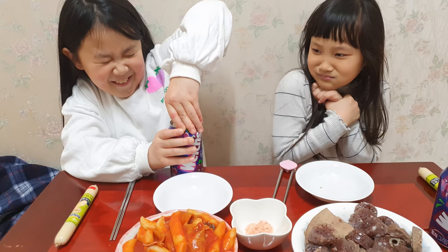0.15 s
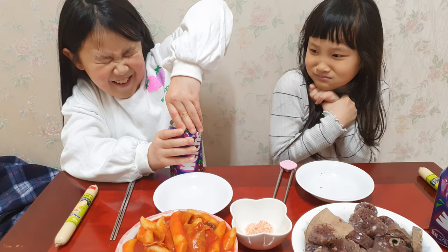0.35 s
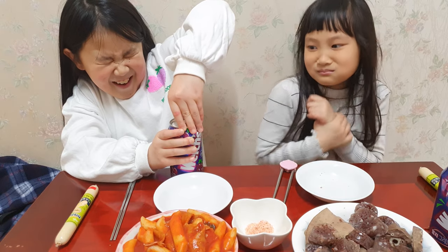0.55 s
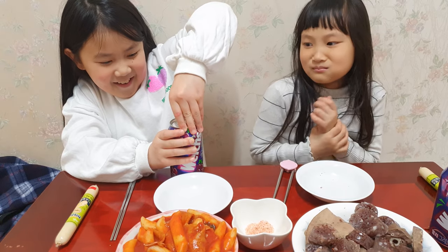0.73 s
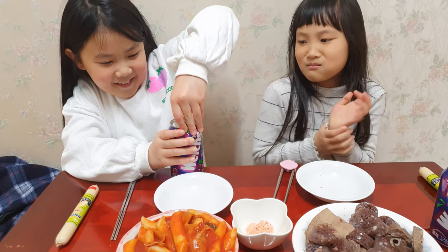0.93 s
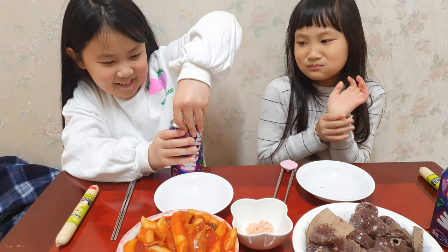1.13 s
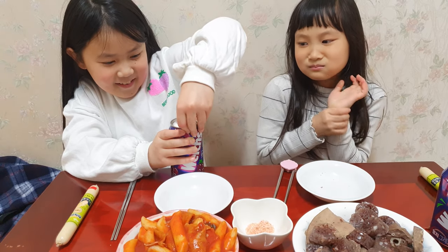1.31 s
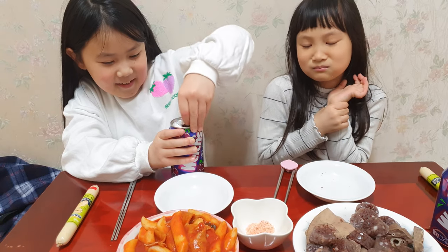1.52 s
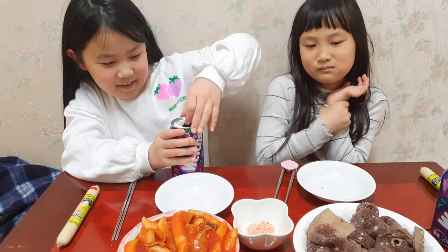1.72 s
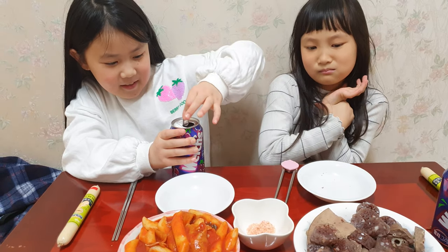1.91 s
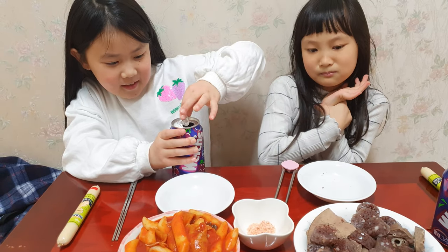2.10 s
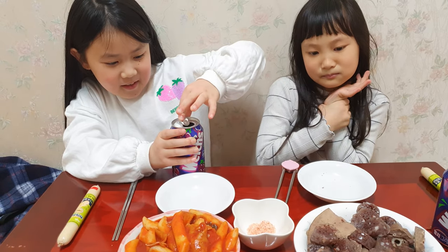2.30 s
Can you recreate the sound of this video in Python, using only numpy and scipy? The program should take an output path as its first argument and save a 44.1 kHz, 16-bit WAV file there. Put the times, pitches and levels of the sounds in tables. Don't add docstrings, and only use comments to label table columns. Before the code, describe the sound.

A full drink can is cracked open with two sharp metallic snaps, then small lid ticks

```python
import sys
import numpy as np
from scipy import signal
from scipy.fft import rfft, irfft
from scipy.io import wavfile
from scipy.ndimage import uniform_filter1d

SR = 44100
rng = np.random.default_rng(int(sys.argv[2]) if len(sys.argv) > 2 else 0)


def inscribe(sig):
    pcm = np.round(np.clip(np.atleast_2d(sig).T, -1, 1) * 32767)
    wavfile.write(sys.argv[1], SR, pcm.astype(np.int16))


def invert_db(x):
    u = np.asarray(x, float) / 20
    return 10 ** u


N = 103635


def clock(count):
    return np.arange(count) / SR


def read(points, hz):
    f, value = np.transpose(points)
    return np.interp(np.log(hz + 1), np.log(f + 1), value)


def level_at(points, t):
    return np.interp(t, *np.transpose(points))


def evened(x):
    return x / np.sqrt(np.mean(x ** 2) + 1e-20)


def drifting(count, size):
    return evened(uniform_filter1d(rng.standard_normal(count), size=size))


def add(mix, s, sound):
    part = mix[round(s * SR):][:len(sound)]
    part += sound[:len(part)]


def filtered(x, gain):
    return irfft(rfft(x) * gain, len(x))


def coloured(points, count):
    hz = np.fft.rfftfreq(count, 1 / SR)
    return evened(filtered(rng.standard_normal(count), invert_db(read(points, hz))))


def band(hz, width_hz, count):
    f = np.fft.rfftfreq(count, 1 / SR)
    return evened(filtered(rng.standard_normal(count), 1 / (1 + (2 * (f - hz) / width_hz) ** 2)))


def boosted(x, bands):
    f = np.fft.rfftfreq(len(x), 1 / SR)
    lift_db = sum(db / (1 + (2 * (f - hz) / width_hz) ** 2) for hz, width_hz, db in bands)
    return evened(filtered(x, invert_db(lift_db)))


# f/Hz, T60/s
ROOM_DECAY = [(150, 0.32), (500, 0.24), (2000, 0.22), (6000, 0.22), (12000, 0.22)]


def fading(noise):
    hz, t, z = signal.stft(noise, SR, nperseg=256)
    decay_db = -60 * t / read(ROOM_DECAY, hz)[:, None]
    tail = signal.istft(z * invert_db(decay_db), SR, nperseg=256)[1]
    return tail * np.minimum(clock(len(tail)) / 0.025, 1)


def room(x):
    tail = fading(rng.standard_normal(SR // 2))
    return signal.fftconvolve(x, tail / np.linalg.norm(tail))[:N]


def patchy(x):
    z = signal.stft(x, nperseg=512)[2]
    field = uniform_filter1d(rng.standard_normal(z.shape[::-1]), size=22, axis=0)
    field = evened(uniform_filter1d(field, size=24, axis=1))
    return signal.istft(z * invert_db(1 * field.T), nperseg=512)[1][:N]


# t/s, level/dB
HUM_LEVEL = [(0, -27), (.43, -30.5), (.62, -31.5), (1.15, -37.5), (1.25, -44), (1.32, -35.5), (1.55, -36.5),
             (1.66, -38.5), (1.92, -31.5), (2.35, -30)]
# f/Hz, width/Hz, level/dB
ROOM_BOOM = [(40.2, 30, -14), (63.3, 6.7, -1), (122.4, 20, -1.5), (157, 29, -13.5), (228, 60, -20),
             (291, 22, -25.5)]
# t/s, level/dB
TONE_LEVEL = [(0, -35), (.04, -31), (.35, -29), (.39, -34), (.56, -26), (.6, -35.5), (.8, -35),
              (1.0, -41.5), (1.25, -47.5), (1.33, -35), (1.42, -37), (1.47, -46.5), (1.62, -48),
              (1.68, -30.5), (1.95, -28), (2.03, -37), (2.2, -36), (2.35, -25.5)]
# f/Hz, density/dB per Hz
HISS_COLOUR = [(300, -6), (450, -10.5), (1200, -13.5), (2300, -19.5), (3200, -13), (8800, -11.5),
               (10500, -18.5), (15600, -28.5)]
TONE_HZ, TONE_WANDER_HZ = 87.8, 2.2
HUM_DB, HISS_DB = -3, -58
HISS_FOLLOW = 0.34


def background():
    t = clock(N)
    hum_db = level_at(HUM_LEVEL, t)
    wander = evened(uniform_filter1d(drifting(N, 2000), size=2000))
    phase = 2 * np.pi * np.cumsum(TONE_HZ + TONE_WANDER_HZ * wander) / SR
    tone = np.sqrt(2) * invert_db(level_at(TONE_LEVEL, t)) * np.sin(phase)
    hum = evened(sum(invert_db(db) * band(hz, width_hz, N) for hz, width_hz, db in ROOM_BOOM))
    hiss = patchy(coloured(HISS_COLOUR, N))
    hiss_db = HISS_DB + HISS_FOLLOW * (hum_db + 37)
    return tone + invert_db(hum_db + HUM_DB) * hum + invert_db(hiss_db) * hiss


# f/Hz, density/dB per Hz
PORT_COLOUR = [(60, -9.5), (90, -6), (300, -20), (800, -30.5), (2000, -41), (3300, -21.5), (9500, -22.5),
               (11500, -30.5)]


def port_hiss():
    return invert_db(-66.5) * coloured(PORT_COLOUR, N)


# t/s, length/s, level/dB, f/Hz, width/Hz
LID_RUBS = [(.64, .2, -54, 9600, 1300), (.641, .21, -56, 6310, 1300), (0.94, 0.162, -64.5, 2400, 800),
            (.83, 0.24, -50.5, 8800, 2500), (0.79, 0.17, -62.5, 3300, 897), (.93, 0.117, -54, 11000, 2500),
            (.93, 0.105, -57.5, 6800, 1500), (1.17, .17, -59, 6100, 2700), (1.2, .18, -61, 8770, 900),
            (1.62, .1, -54, 7400, 4000), (1.58, 0.3, -59, 3590, 1410), (1.7, .16, -60.5, 7000, 3000),
            (1.7, 0.164, -64.5, 5000, 550), (2.4, 0.12, -52, 8500, 2500), (2, 0.1, -56, 5200, 2000),
            (1.961, .2, -58.5, 5610, 1700), (1.951, 0.185, -50.5, 3680, 460), (.56, .1, -40, 8600, 2500),
            (1.98, .09, -47, 3566, 400), (1.96, .18, -54.5, 2980, 680), (1.965, 0.155, -56.5, 6900, 300),
            (1.99, 0.063, -50, 560, 73), (2.177, 0.267, -59.5, 5060, 1100), (2.1, .3, -65, 3230, 740),
            (0.001, 0.25, -59.5, 2300, 1100)]
RUB_EDGE, RUB_FADE = 0.25, 0.25
RUB_GRAIN_DB = 2


def rubs():
    out, count = np.zeros(N), SR // 2
    for s, length, db, hz, width_hz in LID_RUBS:
        noise = band(hz, width_hz, count)
        grain = invert_db(RUB_GRAIN_DB * drifting(count, 200))
        u = clock(count) / length
        swell = np.clip(np.minimum(u / RUB_EDGE, (1 - u) / RUB_FADE), 0, 1) ** 1.19
        add(out, s, invert_db(db) * swell * noise * grain)
    return out


# t/s, peak level/dB, f/Hz, width/Hz
NAIL_TICKS = [(0.0556, -43, 6100, 5000), (0.055, -45.5, 2970, 700), (0.084, -47, 3420, 900),
              (.166, -50.5, 6040, 5105), (.188, -41.5, 5980, 3500), (.213, -51.5, 5000, 3990),
              (0.4269, -25, 6060, 9000), (.782, -43, 3590, 900), (0.8464, -36, 9040, 3000),
              (.8466, -43, 3680, 3000), (1.262, -50.5, 4400, 4000), (1.2899, -41.5, 9300, 2500),
              (1.2911, -45.5, 3860, 3990), (1.5813, -46, 4350, 1503), (1.595, -46, 4000, 2500),
              (1.8599, -30.5, 7620, 2200), (1.864, -28.5, 7500, 3000), (1.864, -35.5, 3780, 1505),
              (1.8747, -28.5, 5450, 2500), (1.880, -37, 3700, 1500), (1.925, -41.5, 3500, 900),
              (1.939, -41, 3500, 1200), (0.2323, -14, 2580, 1500), (.4655, -29.5, 3970, 5000),
              (1.869, -38, 6100, 1200), (1.8745, -36.5, 3500, 1200), (1.8745, -36, 8150, 2000),
              (1.887, -40, 3580, 1195), (1.895, -48, 3300, 1200), (1.8595, -37, 3700, 1196),
              (1.5815, -51, 2490, 1498), (1.594, -54, 2500, 1200), (1.5815, -52.5, 8020, 4000),
              (1.205, -54.5, 5000, 3000)]
TICK_RISE_S, TICK_DECAY_S = 0.00022, 0.0018


def ticks():
    out, t = np.zeros(N), clock(SR // 20)
    shape = np.minimum(t / TICK_RISE_S, 1) * np.exp(-t / TICK_DECAY_S)
    for s, db, hz, width_hz in NAIL_TICKS:
        add(out, s, invert_db(db + 6.5) * shape * band(hz, width_hz, len(t)))
    return out


def port_ticks(small):
    skew = rng.standard_normal(40) * np.hanning(40)
    return invert_db(-18) * signal.oaconvolve(small, skew / np.linalg.norm(skew))[:N]


# t/s, f/Hz
KNOCK_TIMES = [(.0554, 1100), (.183, 1050), (.4268, 700), (.52, 1000), (.47, 430), (.776, 160), (.779, 600),
               (.780, 1200), (.781, 380), (.84, 1235), (1.285, 170), (1.288, 1200), (1.58, 170),
               (1.5815, 1200), (1.5815, 2500), (1.62, 900), (1.70, 160), (1.8593, 1000), (1.92, 220),
               (1.9256, 1000), (1.939, 600), (1.86, 8200), (1.862, 5800), (1.862, 3500), (.70, 540),
               (1.9385, 1000), (.65, 200)]
# level/dB, width/Hz, T60/s
KNOCK_DAMPING = [(-46.5, 380, 0.096), (-52, 430, 0.2), (-37, 150, 0.079), (-27, 250, 0.5), (-13, 150, 0.21),
                 (-27, 72, 0.27), (-32.5, 277, 0.19), (-35.5, 410, 0.16), (-52, 900, 0.22),
                 (-46.5, 220, 0.27), (-36, 82, 0.37), (-51, 1140, 0.23), (-39.5, 69, 0.38), (-47, 560, 0.2),
                 (-49.5, 1500, 0.38), (-56.5, 570, 0.91), (-38, 93, 0.29), (-49, 370, 0.27),
                 (-42, 57, 0.63), (-46, 470, 0.12), (-49, 650, 0.43), (-42, 3000, 0.38), (-41.5, 1700, .4),
                 (-45.5, 1210, 0.6), (-50, 170, .2), (-49, 290, 0.24), (-40, 64, .3)]
KNOCK_RISE_S = 0.0025


def knocks():
    out, t = np.zeros(N), clock(SR // 2)
    for (s, hz), (db, width_hz, t60) in zip(KNOCK_TIMES, KNOCK_DAMPING):
        shape = np.minimum(t / KNOCK_RISE_S, 1) * invert_db(db - 60 * t / t60)
        add(out, s, shape * band(hz, width_hz, len(t)))
    return out


# t/s, level/dB, crack decay/s, thump f/Hz, thump level/dB
TAB_SNAPS = [
    (0.2335, 2, 0.003, 151.9, -17),
    (0.4676, 12, .011, 176.2, -14),
]
# f/Hz, density/dB per Hz
FIRST_COLOUR = [(120, -10), (300, -17), (700, -7.5), (1000, -10), (4260, -0.5), (8600, -4), (11000, -12.5),
                (15500, -19)]
# f/Hz, density/dB per Hz
SECOND_COLOUR = [(120, -9), (400, -8), (690, -10.5), (974, -4.5), (1480, -15.5), (3070, -7), (8500, -8.5),
                 (15500, -31)]
# f/Hz, width/Hz, boost/dB
LID_BANDS = [
    [(700, 110, 4), (1660, 150, 5.5), (2700, 500, 4), (4100, 500, 4), (5100, 280, 2.5), (8400, 1700, 5.5),
     (14500, 560, 8.5), (13800, 570, -10), (11500, 500, 3.5), (12800, 500, 3), (10000, 500, 2.5)],
    [(2800, 500, 5), (3900, 200, 4.5), (5000, 260, 1.5), (7500, 500, 2), (8280, 290, 5.5),
     (10200, 800, 4.5)],
]
CRACK_HOLD = [.011, .04]
CRACK_LEVEL = [0, -6.5]
SNAP_ROOM_DB = -5


def snaps():
    out, t = np.zeros(N), clock(SR // 2)
    colours = (FIRST_COLOUR, SECOND_COLOUR)
    each = zip(TAB_SNAPS, colours, LID_BANDS, CRACK_HOLD, CRACK_LEVEL)
    for (s, db, decay, hz, thump_db), colour, bands, hold, crack_db in each:
        crack = np.minimum(t / 0.0016, 1) ** 2 * np.exp(-np.maximum(t - hold, 0) / decay)
        add(out, s, invert_db(db + crack_db) * crack * boosted(coloured(colour, len(t)), bands))
        wash = fading(boosted(coloured(colour, len(t)), bands))
        add(out, s, invert_db(db + SNAP_ROOM_DB) * wash)
        thump = (1 - np.exp(-t / 0.0045)) * np.exp(-t / 0.054)
        add(out, s, invert_db(thump_db) * thump * band(hz, 47, len(t)))
    return out


def port_snaps():
    out, t = np.zeros(N), clock(SR // 20)
    burst = invert_db(-22) * np.exp(-(t / 0.0073) ** 2)
    for snap, colour in zip(TAB_SNAPS, (FIRST_COLOUR, SECOND_COLOUR)):
        add(out, snap[0], burst * coloured(colour, len(t)))
    return out


# f/Hz, level/dB
TAB_MODES = [(1750, -7), (2650, -4.5), (3500, -6), (5100, 1.5), (2250, -10), (1150, -14.5), (6900, -15),
             (8500, -6.5), (11700, -14)]
SLIP_S, SLIP_DB, SLIP_T60_S = 0.4268, -13, 0.014
SLIP_ROOM_DB, SLIP_WIDTH_HZ = -26, 700


def slip():
    out, t = np.zeros(N), clock(SR // 10)
    ring = sum(invert_db(db) * np.sin(2 * np.pi * hz * t) for hz, db in TAB_MODES)
    add(out, SLIP_S, invert_db(SLIP_DB - 60 * t / SLIP_T60_S) * ring)
    rough = sum(invert_db(db) * band(hz, SLIP_WIDTH_HZ, SR // 2) for hz, db in TAB_MODES)
    add(out, SLIP_S, invert_db(SLIP_DB + SLIP_ROOM_DB) * fading(rough))
    return out


# t/s, f/Hz, level/dB, rise/s, T60/s
LID_MODES = [(0.4817, 1000, -5, 0.01, 0.18), (0.4812, 1064, -7, 0.0084, .15), (.474, 430.4, -8, 0.0064, .2),
             (.474, 330, -11, .01, .2), (.51, 186.8, -17, .01, .25), (.84, 1272, -43, 0.0037, 0.32),
             (1.582, 1223, -43, .002, .2)]
LID_SAG_PER_S = 0.25


def lid():
    out, t = np.zeros(N), clock(SR // 2)
    for s, hz, db, rise, t60 in LID_MODES:
        drift = 0.006 * hz * drifting(len(t), 400)
        phase = 2 * np.pi * np.cumsum(hz * (1 - LID_SAG_PER_S * t) + drift) / SR
        add(out, s, (1 - np.exp(-t / rise)) * invert_db(db - 60 * t / t60) * np.sin(phase))
    return out


def dulled(x):
    f = np.fft.rfftfreq(N, 1 / SR)
    return filtered(x, invert_db(-8 / (1 + np.exp((10300 - f) / 380))))


def scene():
    nail, tab = ticks(), slip()
    small = nail + tab + invert_db(-11.5) * room(nail) + rubs() + knocks()
    mid = background() + dulled(small) + snaps() + lid()
    side = port_hiss() + port_ticks(nail + tab) + port_snaps()
    return np.array([mid + side, mid - side])


def roll_off(x):
    return signal.sosfilt(signal.butter(12, 15890, fs=SR, output="sos"), x)


def record(dry):
    low_cut = signal.butter(3, 31, "high", fs=SR, output="sos")
    ceiling = 1.03
    mid = np.clip(signal.sosfilt(low_cut, dry.mean(0)), -ceiling, ceiling)
    side = (dry[0] - dry[1]) / 2
    return roll_off(np.array([mid + side, mid - side]))


dry = scene()
out = record(dry)
inscribe(out)
```